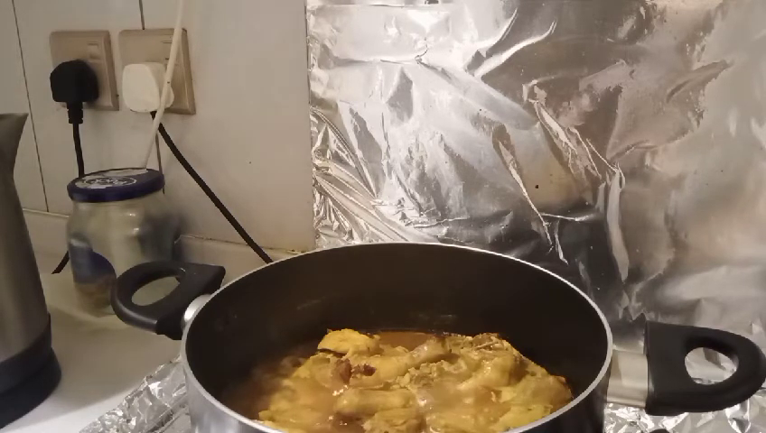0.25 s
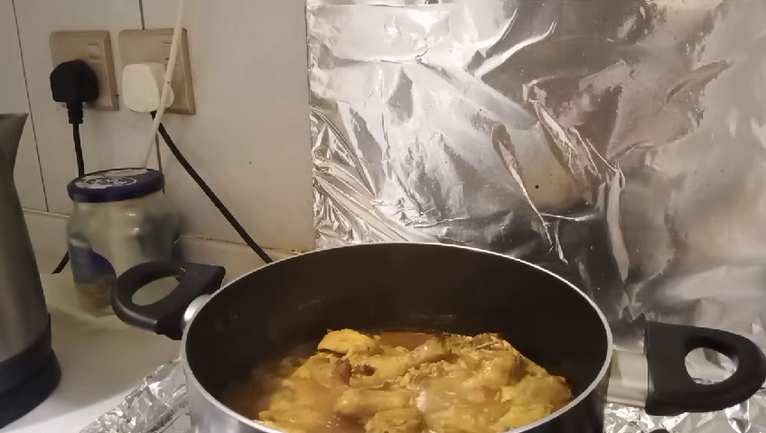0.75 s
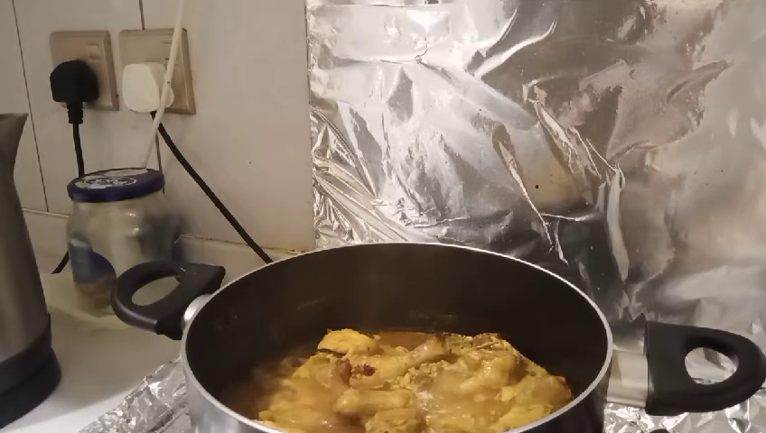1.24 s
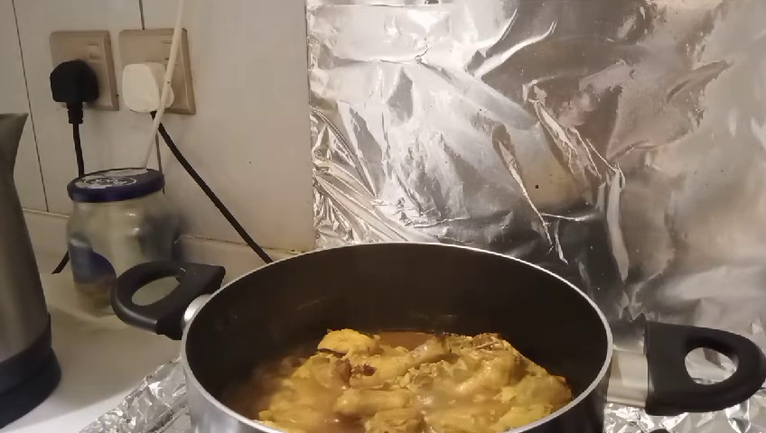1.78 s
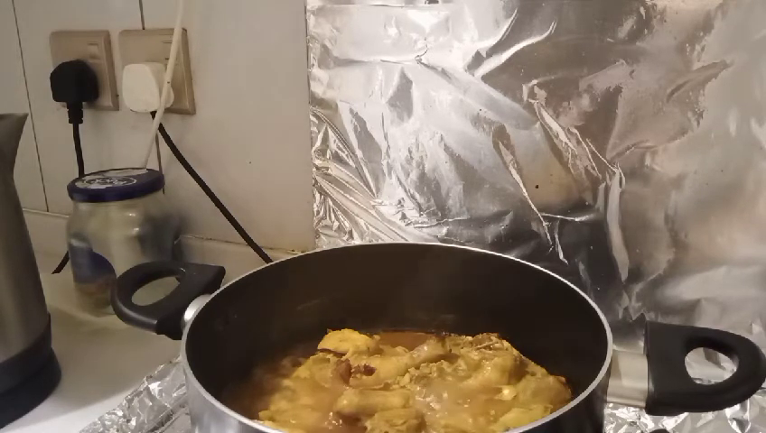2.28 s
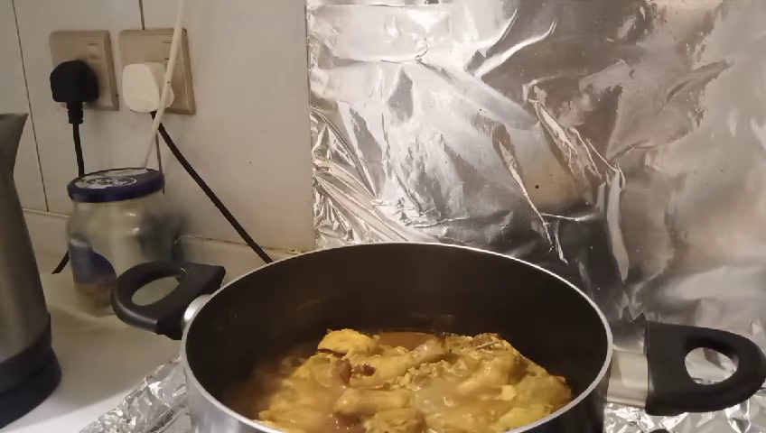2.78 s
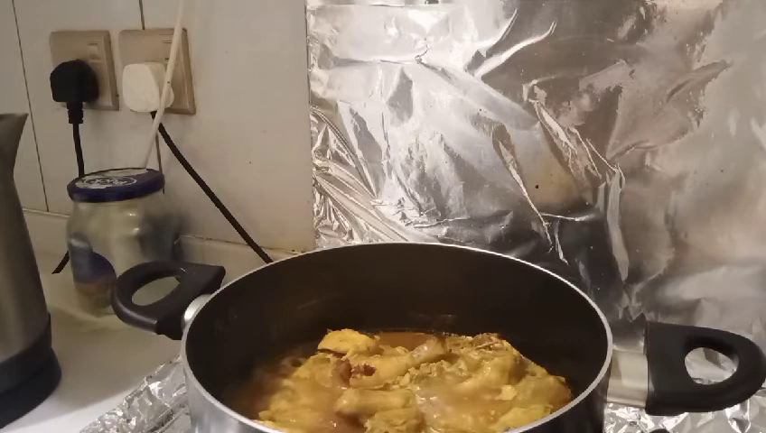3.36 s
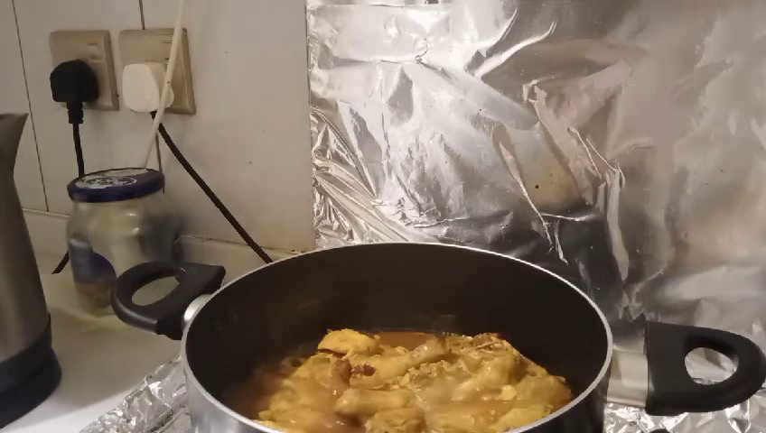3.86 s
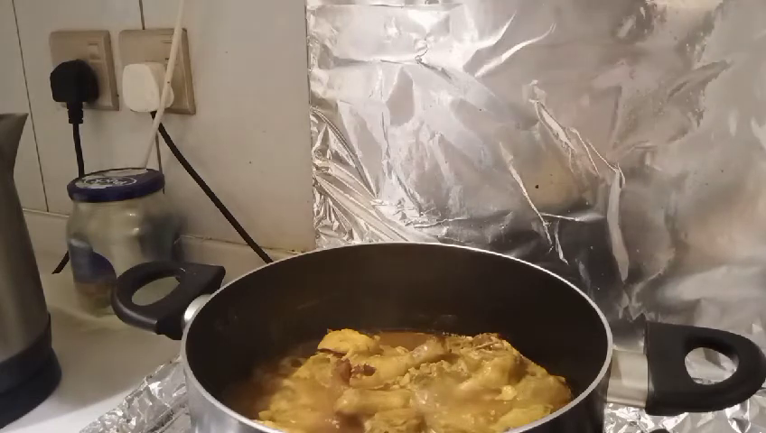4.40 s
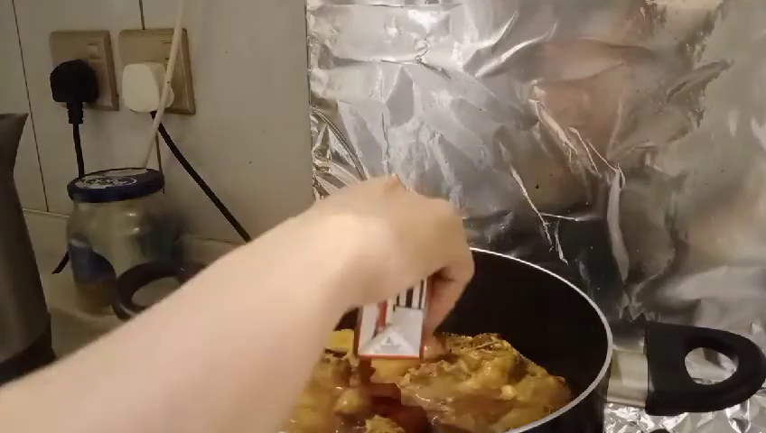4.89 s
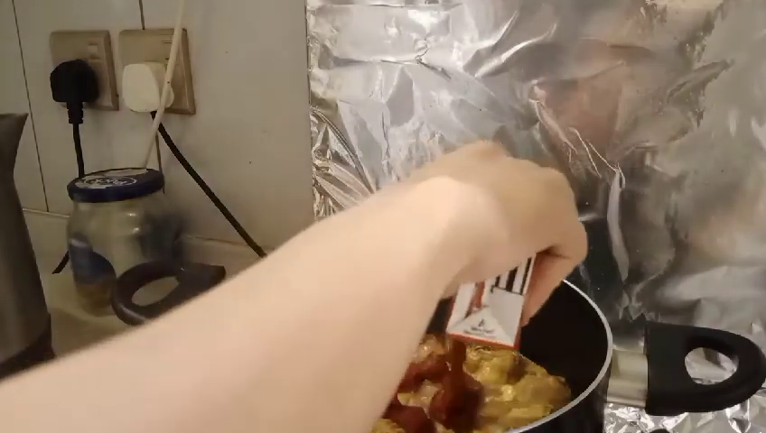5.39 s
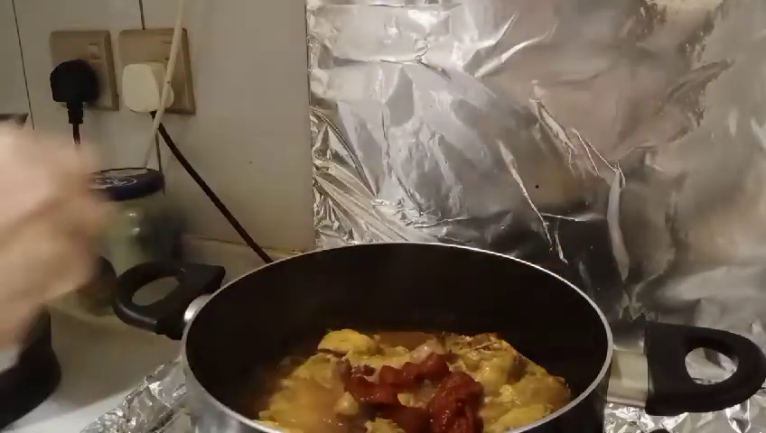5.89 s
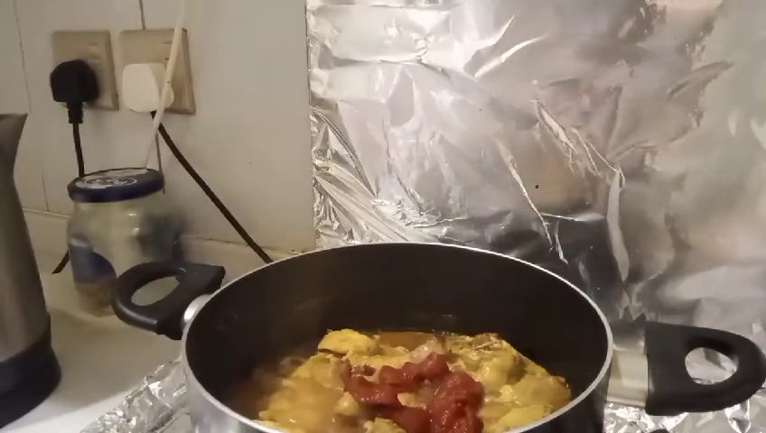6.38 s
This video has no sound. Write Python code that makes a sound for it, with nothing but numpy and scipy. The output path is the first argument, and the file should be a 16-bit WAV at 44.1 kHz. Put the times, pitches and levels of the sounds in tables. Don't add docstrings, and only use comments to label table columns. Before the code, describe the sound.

Faint bubbling and steam hiss lie under a quiet kitchen hum. Slippered feet drag and clap on the floor, first softly, then with a loud snapping double slap and another loud one later, each with a brief small-room echo. The steps fade to near silence before a single sharp, hollow knock of a light carton on the counter. Phone microphone, mono, weak tails broken up.

```python
import sys
import numpy as np
from scipy import signal
from scipy.fft import rfft, irfft, next_fast_len
from scipy.io import wavfile
from scipy.ndimage import uniform_filter1d, map_coordinates

SR = 44100
rng = np.random.default_rng(int(sys.argv[2]) if len(sys.argv) > 2 else 0)


def waveform_to_disk(signal):
    frames = np.transpose(np.atleast_2d(signal))
    scaled = np.clip(frames, -1, 1) * 32767
    samples = np.round(scaled).astype(np.int16)
    wavfile.write(sys.argv[1], SR, samples)


def level_to_linear(level):
    exponent = np.asarray(level, float) / 20
    return 10 ** exponent


N = 293265


def unit(x):
    return x / np.sqrt(np.mean(x ** 2) + 1e-20)


def along(points, hz):
    f, v = np.transpose(points)
    return np.interp(np.log(hz + 1), np.log(f + 1), v)


def filtered(x, response):
    m = next_fast_len(len(x) + 8192)
    return irfft(rfft(x, m) * response(np.fft.rfftfreq(m, 1 / SR)), m)[:len(x)]


def coloured(x, spectrum):
    return unit(filtered(x, lambda hz: level_to_linear(along(spectrum, hz))))


def patchy(size, patchy_db, wide=4, long=5):
    z = signal.stft(rng.standard_normal(size + 512), nperseg=512)[2]
    field = uniform_filter1d(rng.standard_normal(z.shape), wide, axis=0)
    field = uniform_filter1d(field, long, axis=1)
    return signal.istft(z * level_to_linear(patchy_db * unit(field)), nperseg=512)[1][:size]


def wobble(rate):
    return map_coordinates(rng.standard_normal(int(N * rate / SR) + 4), [np.arange(N) * rate / SR])


# (time [s], level [dB], body [dB], brightness re level [dB], air pocket pitch [Hz])
FLAT_SLAPS = [
    (0.0839, -47, 8.5, -5, 3300),
    (0.2424, -49, 4.5, -21, 696),
    (1.943, -47, 7.5, -2, 1390),
    (2.092, -58, 3.5, -17, 1820),
    (2.4974, -21.5, -23, 4, 3800),
    (2.579, -24, -7, -11, 3220),
    (4.0764, -24.5, -8.5, -7.5, 2160),
    (4.5876, -59, 4, -10, 1280),
    (6.586, -68, 14.5, -12, 794),
]
ROLLED_SLAPS = [
    (1.0818, -24.5, -6.5, -6, 4420),
    (3.0842, -32, -12, -5.5, 4450),
]
BRUSHED_SLAPS = [
    (1.554, -40.5, -11, -2, 2670),
    (3.5635, -46.5, -4, -12.5, 4420),
    (4.0116, -39, -13, 1, 3860),
]
# (rise [s], time to fall 60 dB [s])
LANDING_WAYS = [(0.00082, 0.26), (0.011, 0.22), (0.0054, 0.51)]
# (multiple of its pitch, level [dB])
AIR_POCKET = [(0.532, -3.5), (1, 5.5), (1.8, -30)]
# (frequency [Hz], level [dB])
SOLE_BODY = [(100, -39), (250, -22), (480, -5), (750, 5.5), (1150, 8)]


def slaps():
    pocket_q = 7
    out, t = np.zeros(N + SR), np.arange(SR // 2) / SR
    clap = 1 + 1.1 * np.exp(-(t / 0.035) ** 8) + 0.6 * np.exp(-t / 0.005)
    landings = []
    for rows, way in zip((FLAT_SLAPS, ROLLED_SLAPS, BRUSHED_SLAPS), LANDING_WAYS):
        landings += [(*row, *way) for row in rows]
    for s, db, body_db, bright_db, pocket_hz, rise, t60 in landings:
        body = [(hz, level + body_db) for hz, level in SOLE_BODY]
        treble = [(5000, 0), (7400, -2.5), (9300, -24.5), (11700, -23.5), (12300, -17.5), (16000, -17.5)]
        colour = body + [(1700, -2), (4300, -3)] + [(hz, bright_db + level) for hz, level in treble]

        def response(hz):
            bumps = 0
            for multiple, level in AIR_POCKET:
                offset = 2 * pocket_q * (hz / (multiple * pocket_hz) - 1)
                bumps = bumps + level_to_linear(level - 1.5) / (1 + offset ** 2) ** 1.38
            return level_to_linear(along(colour, hz)) + bumps * level_to_linear(max(body_db, 0))

        noise = filtered(unit(patchy(len(t), patchy_db=2.5, wide=2, long=9)), response)
        fall = level_to_linear(-60 * (t / t60) ** 1.714) * (1 - np.exp(-t / rise))
        noise += (level_to_linear(-60 * t / 1.45) - 1) * filtered(noise, lambda hz: hz > 4600)
        out[round(s * SR):][:len(t)] += level_to_linear(db - 10) * clap * fall * noise
    return out[:N]


def gritty(density, size):
    grains = (rng.random(N) < density / SR) * size * rng.standard_normal(N)
    return patchy(N, patchy_db=2.8, wide=3, long=6) + grains


# (time of full pressure [s], held [s], hiss level [dB], rasp re hiss [dB], air re hiss [dB])
STROKES = [(0.0, 0.11, -66.5, -7.5, -4), (0.087, 0.099, -57, -15, -4.5), (0.235, 0.0069, -73, -20, -20),
           (0.47, .11, -80, 3, 2), (0.734, 0.045, -50, -23, -6), (0.918, 0.0067, -71, 4.5, -6),
           (1.134, 0.012, -53, -17, -9.5), (1.19, 0.084, -66.5, -2.5, -9), (1.59, 0.041, -49, -15, -6),
           (1.973, .09, -58.5, -10, -2), (2.112, 0.0048, -77, 12, -26), (2.385, .02, -59.5, -24, 2.5),
           (2.442, 0.089, -52, -13.5, -2.5), (2.63, 0.0088, -60, 9, -11), (2.768, 0.063, -66, -23, -7.5),
           (3.129, 0.093, -55, -17, -2), (3.262, 0.0081, -73, 7, -18), (3.336, 0.0045, -66.5, -8, -11),
           (3.574, 0.095, -56.5, -11, -3), (3.802, 0.0033, -63, -3, -9), (4.354, 0.013, -64.5, -10, 0),
           (4.101, 0.05, -60, 9, -7), (4.558, 0.04, -57, -7.5, -3.5), (4.82, 0.0069, -73.5, 7.5, 5)]
PRESS_RATES = [458, 410, 591]
LIFT_RATES = [230.5, 202, 332.5]
# (frequency [Hz], level [dB])
SOLE_HISS = [(300, -54), (2600, -3.5), (3600, 4), (5000, -1), (7200, 2), (8300, -5.5), (9500, -23.5),
             (11500, -18.5), (12500, -52.5)]
# (frequency [Hz], level [dB])
SOLE_RASP = [(500, -19.5), (1100, 2.5), (1500, 1.5), (2600, -5.5), (3400, -34)]
# (frequency [Hz], level [dB])
AIRY_TOP = [(8000, -51), (9500, -13), (11700, -15), (12300, -4.5), (15500, -5.5)]


def scuffs():
    gains, t = np.zeros((3, N)), np.arange(N) / SR
    for s, held, hiss_db, rasp_db, air_db in STROKES:
        press_db = np.outer(PRESS_RATES, np.maximum(s - t, 0))
        lift_db = np.outer(LIFT_RATES, np.maximum(t - s - held, 0))
        parts_db = hiss_db + np.array([[0], [rasp_db], [air_db - 6]])
        gains += level_to_linear(parts_db - press_db - lift_db)
    hiss, rasp, air = uniform_filter1d(gains, size=300, axis=1)
    grit = gritty(density=900, size=3)
    drag = hiss * coloured(grit, SOLE_HISS) + rasp * coloured(grit, SOLE_RASP)
    return drag, air * coloured(rng.standard_normal(N), AIRY_TOP)


# (time [s], length [s], pitch [Hz], level
# [dB])
CHIRPS = [(0.798, 0.042, 1466, -66), (1.253, 0.084, 1720, -72), (1.664, 0.078, 1727, -66.5),
          (2.418, 0.094, 1394, -59.5), (3.312, 0.054, 2453, -64.5), (3.703, 0.075, 1430, -66),
          (4.586, 0.041, 1306, -56.5), (0.597, 0.05, 2380, -70.5), (3.867, 0.15, 2040, -66.5),
          (4.597, 0.091, 3290, -72), (5.96, 0.2, 3210, -75), (6.524, 0.025, 5340, -72),
          (6.574, 0.05, 240, -59.5), (2.096, 0.034, 1824, -61.5), (3.08, 0.058, 341, -60.5),
          (1.554, 0.054, 510, -63), (2.57, 0.078, 671, -50)]


def squeaks():
    out, t = np.zeros(N), np.arange(N) / SR
    noise = rng.standard_normal(N)
    for s, length, hz, db in CHIRPS:
        note = unit(filtered(noise, lambda f: 1 / (1 + ((f - hz) / 70) ** 2) ** 2))
        swell = np.sin(np.pi * np.clip((t - s) / length, 0, 1)) ** 0.34
        out += level_to_linear(db) * swell * note
    return out


# (time [s], level [dB], pitch [Hz])
FLOOR_THUDS = [(0.076, -49.5, 194), (0.74, -50.5, 122.5), (1.088, -52.5, 361), (1.937, -59, 127),
               (2.598, -54, 158), (2.675, -56.5, 132), (3.114, -53, 125), (3.568, -50.5, 130.3),
               (4.091, -45.5, 430), (4.119, -39.5, 94), (4.128, -49, 213), (4.189, -45.5, 145),
               (4.994, -54, 118)]


def thuds():
    out, t = np.zeros(N + SR), np.arange(SR // 2) / SR
    for s, db, hz in FLOOR_THUDS:
        drift = np.cumsum(uniform_filter1d(rng.standard_normal(len(t)), size=600)) * 0.057
        swell = level_to_linear(db - 2 - 60 * (t / 0.32) ** 0.84) * (1 - np.exp(-t / 0.0044))
        out[round(s * SR):][:len(t)] += swell * np.sin(2 * np.pi * hz * t + drift)
    return out[:N]


def ring(modes, t, attack):
    tones = sum(level_to_linear(db - 60 * t / t60) * np.sin(2 * np.pi * hz * t) for hz, db, t60 in modes)
    return tones * (1 - np.exp(-t / attack))


# (time [s], level [dB])
CARTON_BLOW = [
    (6.341, -18.5),
]
# (frequency [Hz], level [dB], time to fall 60 dB [s])
CARTON_MODES = [(1062, 19, 0.0093), (628, 6.5, 0.013), (913, 2, 0.029), (1512, -7, 0.028),
                (3600, -9, 0.011), (4420, -21, 0.0083)]
# (frequency [Hz], level [dB], time to fall 60 dB [s])
COUNTER_MODES = [(145, 0, 0.24), (295, 9.5, 0.047), (444.7, -6.5, 0.31), (575, 0.5, 0.17),
                 (1238, -19, 0.45), (1144, -11, 2.8), (1358, -34, 1.3)]
# (frequency [Hz], level [dB])
WALL_TAIL = [(50, -40), (100, 1), (150, 1), (250, -16), (600, -6.5), (900, -10), (1350, -5.5), (1800, -30),
             (4300, -27), (5200, -40.5), (7400, -35.5), (9000, -56), (15500, -52)]
# (frequency [Hz], level [dB])
IMPACT_CRACK = [(1200, -41), (2500, 8), (5000, 5), (8000, -10), (10000, -20.5), (16400, -13)]


def knock():
    out, t = np.zeros(N + SR), np.arange(SR // 2) / SR
    s, db = CARTON_BLOW[0]
    blow = ring(CARTON_MODES, t, attack=0.0031)
    rock = level_to_linear(-9) * np.roll(blow, round(0.0062 * SR))
    counter = [(hz, level, min(t60, 0.4)) for hz, level, t60 in COUNTER_MODES]
    board = level_to_linear(-17.5) * ring(counter, t, attack=0.001)
    walls = level_to_linear(-15 - 60 * (t / 0.24) ** 1.19) * (1 - np.exp(-t / 0.0012))
    walls = walls * coloured(patchy(len(t), patchy_db=2.0, wide=2, long=6), WALL_TAIL)
    crack = level_to_linear(-19 - 60 * t / 0.044) * coloured(rng.standard_normal(len(t)), IMPACT_CRACK)
    out[round(s * SR):][:len(t)] = level_to_linear(db + 2.5) * (blow + rock + board + walls + crack)
    return out[:N]


# (frequency [Hz], level [dB])
ROOM_HUM = [(25, -50), (90, -7.5), (400, -10), (600, -15.5), (1400, -18), (2600, -26.5), (5000, -29.5),
            (6000, -39.5), (8300, -36), (9300, -67), (11500, -52), (12300, -40), (16000, -44)]
POT_PITCHES = [124, 297, 1340, 2060, 2395, 3137, 3254, 4362, 5308, 5572, 6680, 7190, 7730, 8050, 8800]
# (width [Hz], level [dB])
POT_RESONANCES = [(31.1, -1), (39.4, -6.5), (74.3, -14), (256.5, -11), (107, -8.5), (27, -10),
                  (19.9, -11.5), (39.3, -21), (78.5, -15.5), (70, -19), (38.28, -20), (124, -26),
                  (180, -12.5), (195, -24.5), (103, -37.5)]
# (time [s], level [dB])
AIRY_BURSTS = [(0.0487, -61), (0.1426, -55), (0.6918, -55), (0.7317, -58.5), (1.0945, -56), (1.1538, -51),
               (1.5594, -52), (1.6896, -51), (1.9495, -55), (2.0078, -49.5), (2.3764, -61), (2.5007, -22),
               (3.0934, -48), (3.5224, -59.5), (3.5728, -65), (3.7858, -56), (4.0223, -70), (4.06, -49.5),
               (4.3515, -72), (4.5077, -52.5), (4.986, -63.5), (5.342, -58.5)]


def kitchen():
    t = np.arange(N) / SR
    hum_db = -70.3 + 2.17 * wobble(2.638)
    steam_db = -88 + 7 * wobble(2.8)
    hum = level_to_linear(-0.5) * coloured(patchy(N, patchy_db=3.5), ROOM_HUM)

    def wall(f):
        power = 0
        for centre, (width, db) in zip(POT_PITCHES, POT_RESONANCES):
            power = power + level_to_linear(2 * db) / (1 + (2 * (f - centre) / width) ** 2) ** 1.48
        return np.sqrt(power)

    pot = level_to_linear(-1.5) * unit(filtered(patchy(N, patchy_db=4.0, wide=3, long=4), wall))
    steam = level_to_linear(steam_db - 5)
    for s, db in AIRY_BURSTS:
        steam = steam + level_to_linear(db - 13) * np.exp(-np.abs(t - s - 0.004) / 0.0056)
    return level_to_linear(hum_db + 1) * (hum + pot) + steam * coloured(patchy(N, patchy_db=-6.5), AIRY_TOP)


def let_through(moving, steady, strength):
    z = signal.stft(moving, nperseg=1024, noverlap=768)[2]
    floor = np.mean(np.abs(signal.stft(steady, nperseg=1024)[2]) ** 2, axis=1, keepdims=True)
    power = uniform_filter1d(np.abs(z) ** 2, size=5, axis=0)
    power = np.abs(uniform_filter1d(power, size=4, axis=1))
    gain = power / (power + strength * uniform_filter1d(floor, size=15, axis=0))
    return signal.istft(z * gain, nperseg=1024, noverlap=768)[1][:N]


def scene():
    room = kitchen()
    drag, air = scuffs()
    steps = let_through(drag + squeaks() + slaps(), room, strength=6)
    low = filtered(room + steps + air + thuds(), lambda hz: hz < 15760)
    blow = let_through(knock(), room, strength=1.6)
    blow = filtered(blow, lambda hz: (hz < 16400) * hz ** 2 / (hz ** 2 + 70 ** 2))
    return (low + blow)[None]


def top_cut(x):
    return signal.sosfilt(signal.butter(12, 16460, fs=SR, output="sos"), x)


def record(dry):
    return top_cut(dry)


dry = scene()
out = record(dry)
waveform_to_disk(out)
```